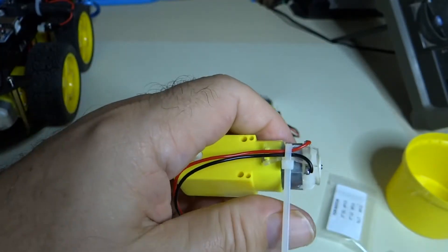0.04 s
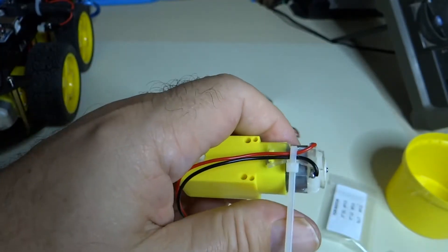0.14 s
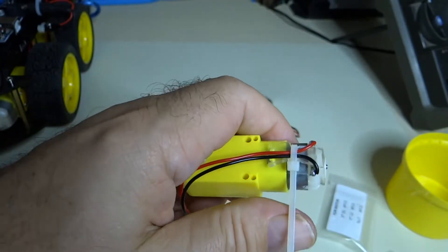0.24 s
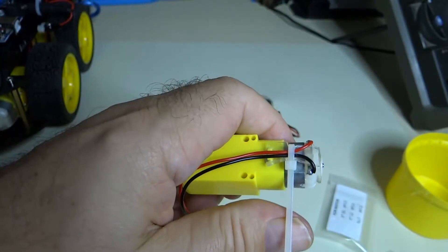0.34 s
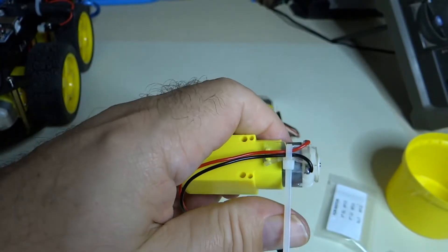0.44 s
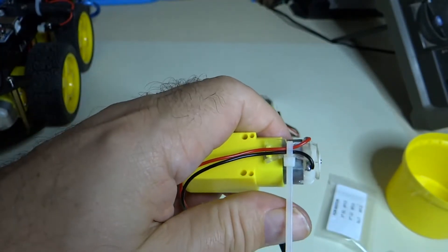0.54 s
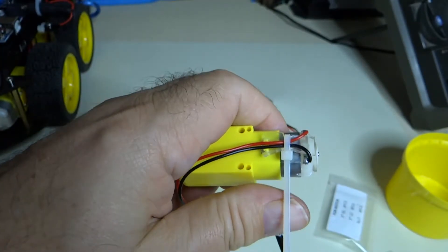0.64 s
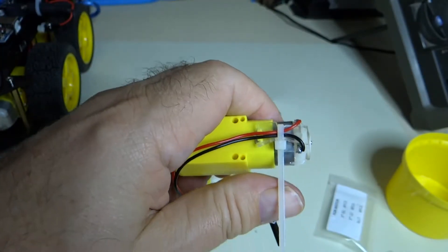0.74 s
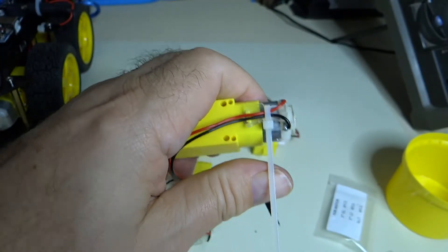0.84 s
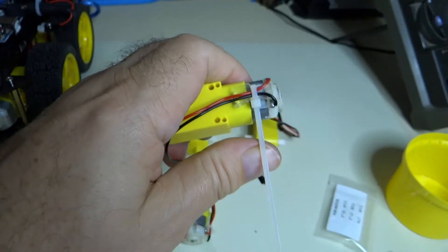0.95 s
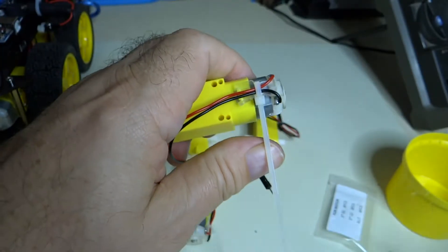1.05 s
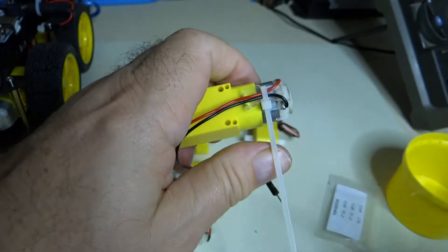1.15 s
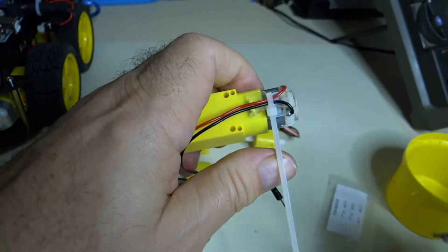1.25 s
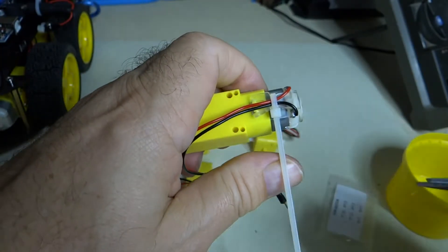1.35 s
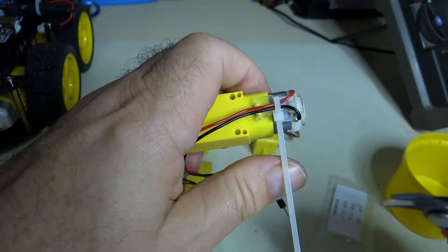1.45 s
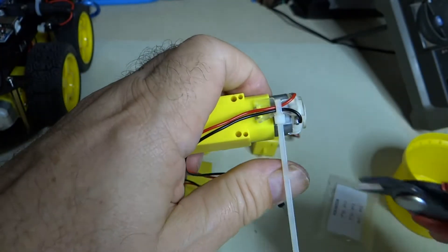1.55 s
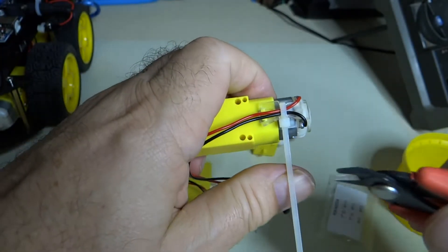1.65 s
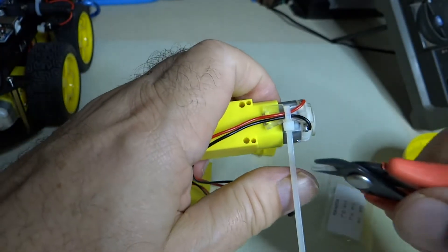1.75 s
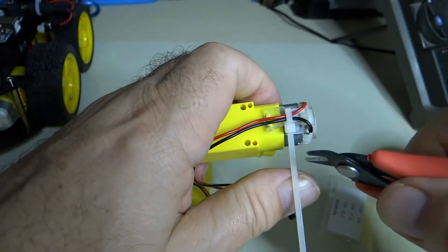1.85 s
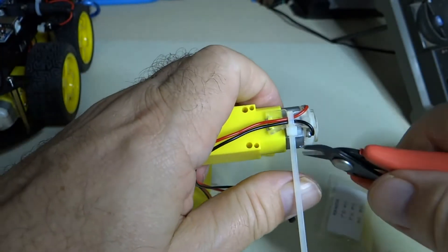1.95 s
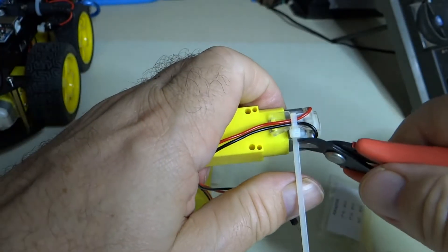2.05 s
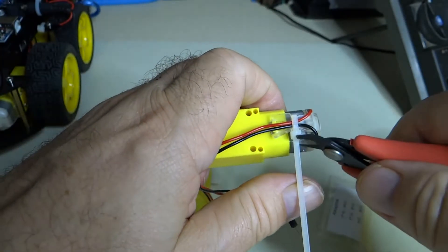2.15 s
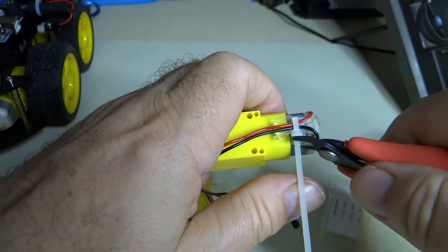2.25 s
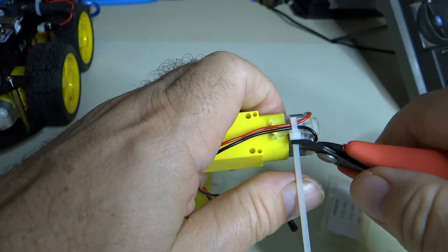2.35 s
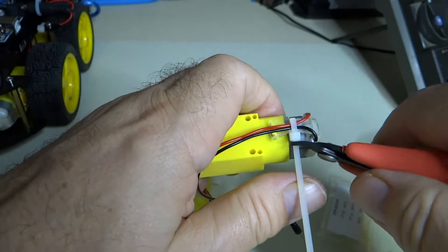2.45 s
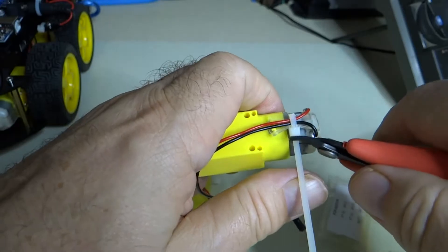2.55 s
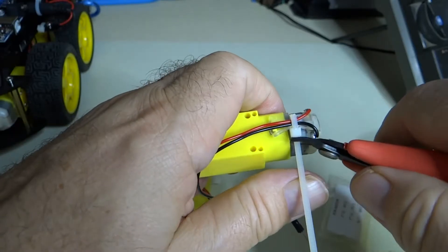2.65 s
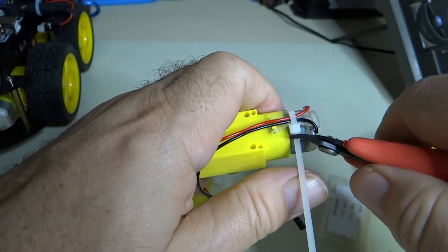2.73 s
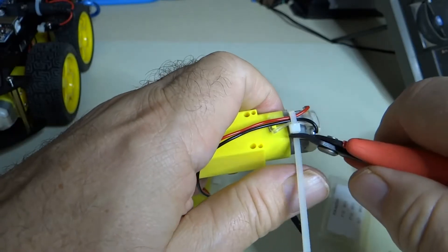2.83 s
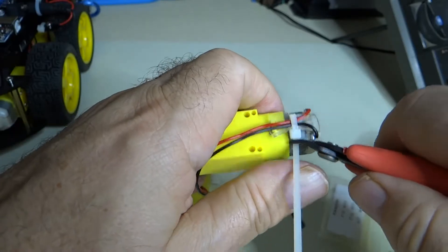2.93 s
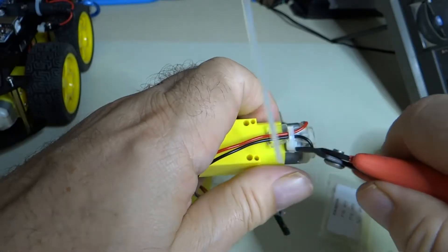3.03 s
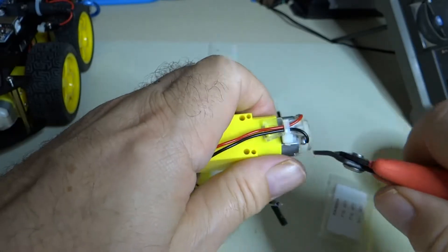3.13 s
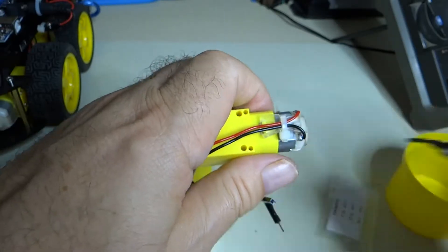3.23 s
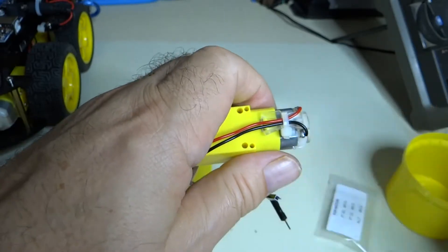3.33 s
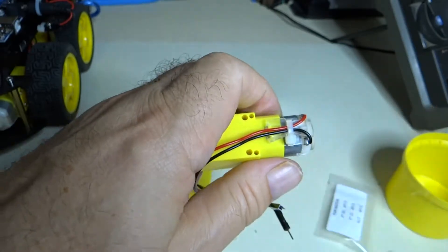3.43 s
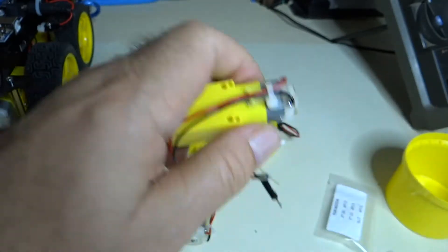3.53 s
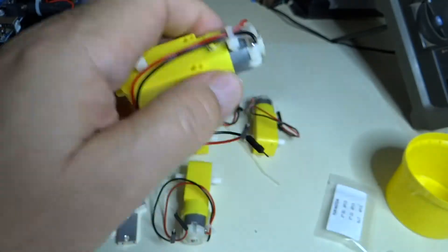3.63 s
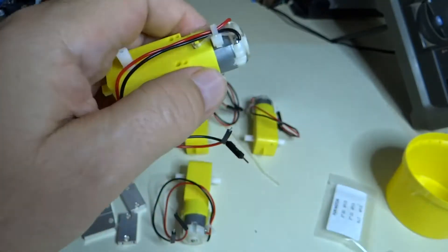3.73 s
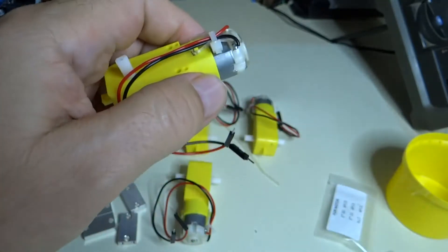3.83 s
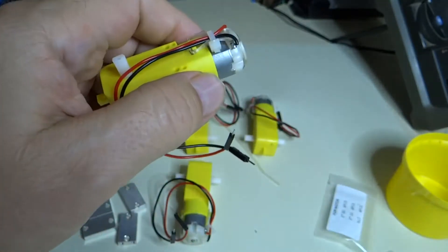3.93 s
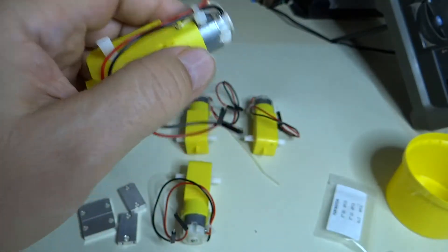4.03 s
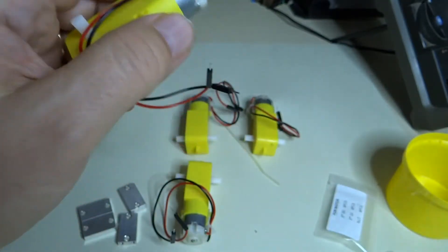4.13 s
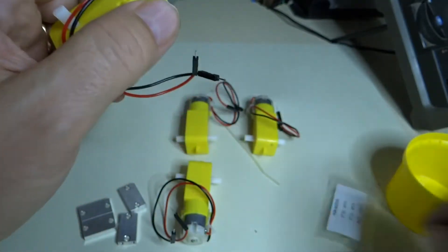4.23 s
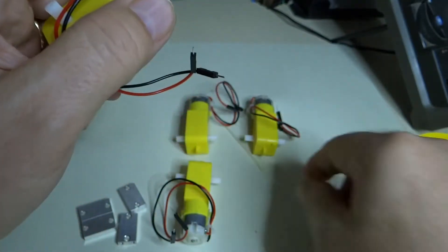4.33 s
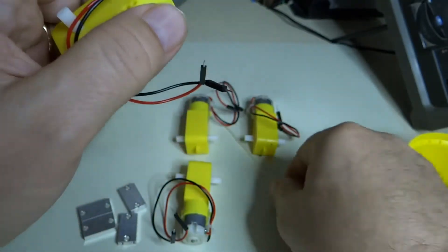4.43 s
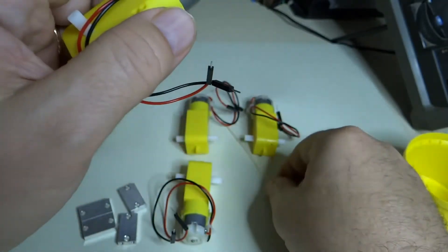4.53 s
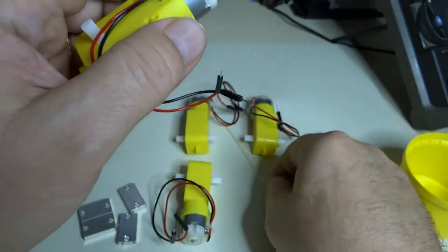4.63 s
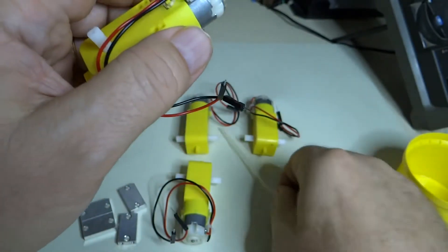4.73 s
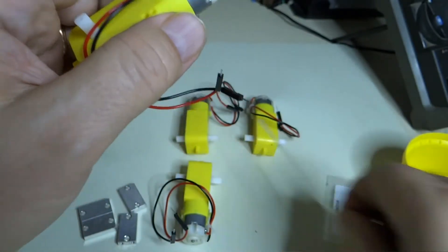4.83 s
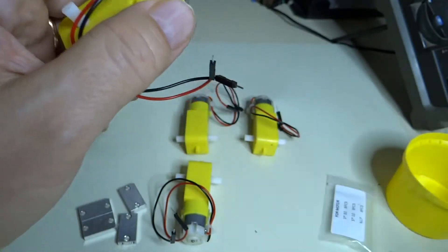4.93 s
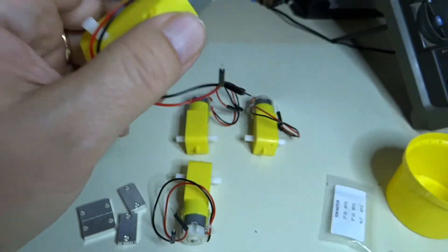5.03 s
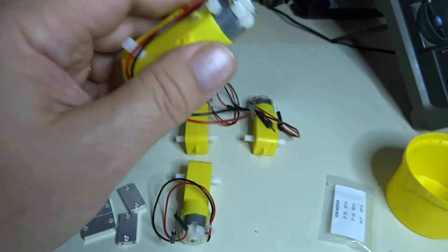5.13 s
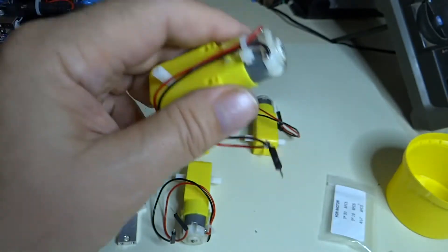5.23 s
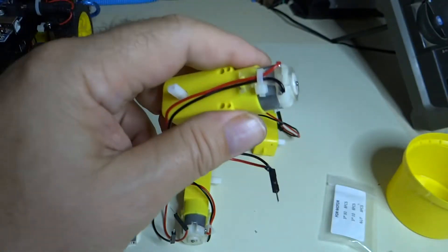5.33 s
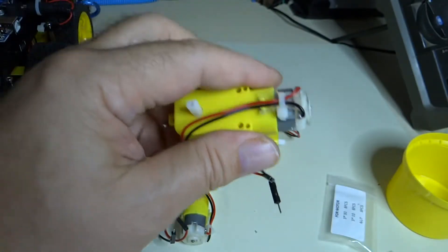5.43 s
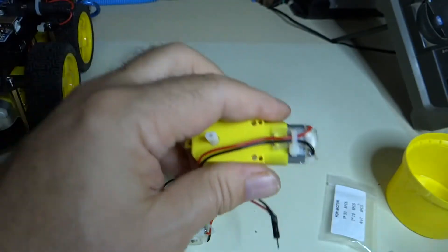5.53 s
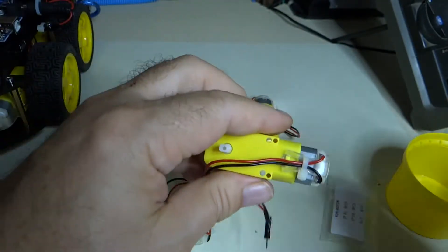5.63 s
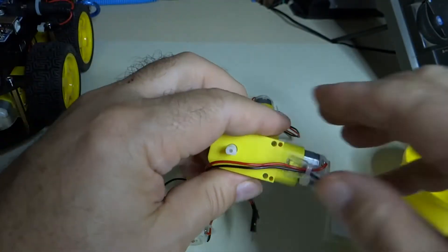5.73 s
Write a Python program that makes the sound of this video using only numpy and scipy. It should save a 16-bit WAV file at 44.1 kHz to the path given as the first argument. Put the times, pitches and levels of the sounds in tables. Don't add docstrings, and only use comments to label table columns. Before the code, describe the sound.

Close desk work in a quiet room: tool knock, faint ticks, a sharp plastic snip, springing snaps, a bouncing tool, soft sleeve rustle.

```python
import sys
import numpy as np
from scipy import signal
from scipy.fft import rfft, irfft, next_fast_len
from scipy.io import wavfile
from scipy.ndimage import uniform_filter1d

SR = 44100
rng = np.random.default_rng(int(sys.argv[2]) if len(sys.argv) > 2 else 0)


def wav_out(sig):
    wavfile.write(sys.argv[1], SR, np.round(np.clip(np.atleast_2d(sig).T, -1, 1) * 32767).astype(np.int16))


def gain_from_decibels(decibels):
    exponent = np.asarray(decibels, float) / 20
    return 10 ** exponent


N = 254677
LEAD = 2205

# [t/s, peak level/dB, centre f/Hz, room level/dB]
SNAPS = [(0.7297, -45.5, 4940, 0.5), (1.2306, -48, 8450, -10), (1.926, -35.5, 3300, -8),
         (2.2739, -48.5, 3780, -6), (2.7686, -39.5, 3780, -7), (3.031, -46.5, 4670, -3),
         (3.0839, -13.5, 5900, -7), (3.0884, -23, 4530, -13), (3.0924, -21, 5850, -15),
         (3.1054, -27, 4450, -12), (3.1418, -17, 5260, -9), (3.1454, -18, 6500, -7.5),
         (3.1524, -15.5, 8900, -7.5), (3.1614, -26, 7250, -7), (3.1954, -33.5, 7180, -9),
         (3.2244, -35, 5270, -12), (3.8372, -17, 9500, -9), (4.0367, -31, 12000, -6.5),
         (4.0627, -39, 8500, -9), (4.4094, -44, 8720, -7), (5.0833, -39, 4600, -11),
         (5.0907, -32, 10500, -4), (5.2342, -48.5, 2800, -7), (5.3457, -47, 8800, 0), (5.362, -41, 8660, 0),
         (5.4538, -45, 4980, 3), (5.4634, -45, 5280, -6), (2.045, -52, 1300, -10)]
# [f/Hz, level/dB, time to fall 60 dB/s]
EARLY_STEEL = [(8450, 1.5, 0.24), (10420, 3, .2), (11620, -3, .25), (12800, 2, .22), (14200, 5, .22),
               (15600, 0, .2)]
LATE_STEEL = [(7450, -5, .4), (8195, -9, .2), (10050, 2, .22), (11440, -12, .3), (13500, -2, .25)]
# [t/s, peak level/dB, main ring f/Hz]
DROP_BOUNCES = [
    (-.03, -8, 1620),
    (-.008, -9, 805),
    (.003, -9.5, 2100),
    (.011, -9, 1300),
    (.021, -8, 1670),
    (.031, -17, 826),
    (.065, -21, 1300),
]
NUDGE_BOUNCES = [
    (.387, -31, 1020),
    (.399, -34.5, 920),
    (.419, -38, 1070),
    (.44, -42, 888),
    (.479, -41, 890),
    (.489, -39, 1240),
    (.504, -41, 834),
    (.529, -46, 977),
]
SET_DOWN_BOUNCES = [
    (3.598, -18.5, 1060),
    (3.613, -15.5, 1830),
    (3.624, -19.5, 1140),
    (3.639, -26, 980),
    (3.659, -28, 1040),
    (3.75, -32.5, 1000),
    (3.764, -31.5, 999),
    (3.779, -29, 1080),
]
CLACK_BOUNCES = [
    (3.808, -7, 1070),
    (3.814, -10, 1150),
    (3.825, -10.5, 1180),
    (3.839, -13.5, 1150),
    (3.855, -17, 1070),
    (3.869, -27, 1190),
    (3.884, -23, 1540),
    (3.898, -22.5, 1200),
]
# [f/Hz, width/Hz, level/dB]
DESK_BODY = [(822, 42, 1), (1152, 57, -0.5), (1300, 34, -1), (1586, 89, -3.5), (2150, 31, -8),
             (2340, 67, -6.5), (2590, 40, -10.5), (3180, 26, -13.5), (3480, 42, -11.5)]
# [f/Hz, level/dB, time to fall 60 dB/s]
DESK_RING = [(554, -8, 0.65), (888, 2.5, 0.66), (1077, 0.5, .6), (1416, -5, 0.78)]
# [t/s, level/dB, f/Hz,
# time to fall 60 dB/s, pitch wobble share]
SMALL_RINGS = [(.73, -54, 2000, 0.085, .014), (.73, -58, 5030, .12, .02), (.85, -65, 2186, 3.9, 0.074),
               (3.75, -41.5, 2500, .3, 0.047), (3.75, -45, 4000, .4, .3), (3.901, -41, 1300, 0.3, 0.35),
               (5.116, -48.5, 1893, .13, .03), (5.457, -47.5, 1950, 0.06, .06),
               (-.01, -49, 3490, 0.65, 0.098), (-.01, -43.5, 4360, .65, .09), (-.01, -52, 5570, .6, 0.083)]
# [start t/s, lift t/s, level/dB, fade/dB per s, desk drone level/dB]
STROKES = [(.43, .5, -58.5, 110, -12), (.7, .73, -69, 70, -20), (.9, .98, -65.5, 50, -22),
           (1.14, 1.28, -62.5, 150, -23), (2.1, 2.27, -65.5, 200, -18), (3.01, 3.21, -53, 110, -9),
           (3.3, 3.46, -68, 30, -13), (4.02, 4.06, -59, 80, -13), (4.14, 4.32, -49, 95, -12),
           (4.36, 4.43, -56, 55, -13), (5.09, 5.14, -62, 45, -19), (5.2, 5.245, -62, 110, -15),
           (5.33, 5.38, -69, 100, -22), (5.43, 5.5, -64, 60, -20), (5.505, 5.6, -52.5, 100, -11),
           (5.555, 5.68, -48.5, 110, -9), (5.71, 5.82, -55, 60, -6)]
# [f/Hz, level/dB]
CLOTH_COLOUR = [(60, -35), (230, -15), (450, -9.5), (1050, -6.5), (3200, -7.5), (5800, -12.5), (8500, -11),
                (10500, -16.5), (12000, -29.5), (15800, -30.5)]
# [f/Hz, time to fall 60 dB/s]
ROOM_DECAY = [(100, 0.46), (500, 0.39), (1500, 0.35), (4500, 0.41), (10000, 0.31)]
# [f/Hz, level/dB]
AIR_COLOUR = [(25, -24), (52, -1.5), (90, -11), (180, -9), (260, -3), (600, -2.5), (900, -1), (1300, -6.5),
              (2100, -5.5), (4500, -10), (6000, -15.5), (8000, -11.5), (10500, -15.5), (13000, -22)]
# [f/Hz, width/Hz, level/dB]
FAN_LINES = [(50.6, 12, -89.5), (230, 30, -82.5), (1039.5, 30, -74), (2170, 120, -82), (9400, 15, -90.5)]
# [f/Hz, likeness 0 to 1]
LIKENESS = [(60, 1), (240, 0.97), (950, 0.35), (3770, 0.5), (15000, 0.83)]
# [f/Hz, level/dB]
CAPSULE = [(10000, 0), (11000, -6.5), (12200, -16), (16000, -16)]


def snip(db, thump_db, room_db):
    x = blow(t60=0.02, crack=0.12)
    mids = peaked(band(x, 1460, 5200))
    treble = peaked(band(x, 4300, 15500))
    y = gain_from_decibels(db) * peaked(mids + 0.58 * treble)
    return np.array([y + gain_from_decibels(db + thump_db) * thump(x), gain_from_decibels(room_db) * y])


def click(db, hz, room_db):
    chatter_s = 0.025 - 0.0001 * (db + 20)
    x = blow(chatter_s, crack=0.42)
    crack = peaked(band(x, 0.46 * hz, 2.5 * hz))
    centre = peaked(resonate(band(x, 0.6 * hz, 1.6 * hz), hz, 0.15 * hz))
    fizz = peaked(band(x, max(hz, 9000), 22000))
    y = gain_from_decibels(db + 1.5) * (peaked(crack + 0.3 * centre) + 0.09 * fizz)
    return np.array([y + gain_from_decibels(db - 42) * thump(x), gain_from_decibels(room_db) * y])


def thump(x):
    shell = peaked(resonate(resonate(x, 370, 200), 370, 200))
    hand = peaked(band(x, 25, 220))
    return shell + 0.12 * hand


def ring(db, modes, blur=0.0, room_db=-6):
    t = np.arange(SR // 2) / SR
    y = np.zeros(len(t))
    for hz, mode_db, t60 in modes:
        fall = gain_from_decibels(-60 * t / t60)
        drift = evened(uniform_filter1d(rng.standard_normal(len(t)), size=40))
        wobble = blur * hz * np.cumsum(drift) / SR
        y += gain_from_decibels(db + mode_db) * fall * np.sin(2 * np.pi * (hz * t + wobble))
    y *= np.minimum(t / 0.002, 1)
    return np.array([y, gain_from_decibels(room_db) * y])


def landing(bounces, thud_db, edge_db, room_db, clank):
    sounds = []
    for k, (s, db, hz) in enumerate(bounces):
        first_db = 6.5 if k == 0 else 0
        sounds.append((s, knock(db, thud_db, edge_db + first_db, room_db, hz, clank)))
    return sounds


def knock(db, thud_db, edge_db, room_db, hz, clank):
    x = blow(t60=0.03, crack=0.31)
    soft = band(x, 450, 2500 + 2400 * clank)
    desk = peaked(sum(gain_from_decibels(g) * resonate(soft, f, 3.5 * width) for f, width, g in DESK_BODY))
    tool = peaked(resonate(soft, hz, 0.32 * hz))
    hard = peaked(resonate(x, 4000, 2400))
    y = peaked(0.74 * desk + 1.1 * tool + clank * hard)
    y = y + gain_from_decibels(thud_db + 6) * peaked(band(x, 330, 761))
    y = y + gain_from_decibels(edge_db) * peaked(band(x, 3000, 10950))
    y = y + gain_from_decibels(thud_db - 17.5) * peaked(band(x, 25, 210))
    y = gain_from_decibels(db + 0.13) * y
    return np.array([y, gain_from_decibels(room_db) * y])


def blow(t60, crack):
    t = np.arange(3000) / SR
    fall = gain_from_decibels(-60 * t / t60)
    return (t == 0) + crack * rng.standard_normal(len(t)) * fall


def hits():
    mix = np.zeros((2, N + LEAD))
    add(mix, 2.686, snip(db=-18, thump_db=-17.5, room_db=-10.5))
    for s, db, hz, room_db in SNAPS:
        add(mix, s, click(db, hz, room_db))
    add(mix, -0.008, ring(-39, EARLY_STEEL, blur=0.012))
    add(mix, 3.838, ring(-33, LATE_STEEL, blur=0.03))
    landings = [landing(DROP_BOUNCES, thud_db=-17.5, edge_db=-23.5, room_db=-1, clank=0.3),
                landing(NUDGE_BOUNCES, thud_db=-14, edge_db=-20, room_db=-1.5, clank=0.15),
                landing(SET_DOWN_BOUNCES, thud_db=-15, edge_db=-21.5, room_db=-3.5, clank=0.2),
                landing(CLACK_BOUNCES, thud_db=-20.5, edge_db=-24.5, room_db=-6, clank=0.95)]
    for sounds in landings:
        for s, sound in sounds:
            add(mix, s, sound)
    add(mix, 0, ring(-36, DESK_RING, blur=0.025))
    for s, db, hz, t60, blur in SMALL_RINGS:
        add(mix, s, ring(db, [(hz, 0, t60)], blur))
    heard = mix[0] + room(mix[1])[:, :N + LEAD]
    return capsule(heard)[:, LEAD:LEAD + N]


def slides():
    rub = hiss(CLOTH_COLOUR, patchy_db=0.4, like=1.4)
    catches = evened(uniform_filter1d(rng.standard_normal(N), size=300))
    rub *= gain_from_decibels(0.91 * catches)
    rub /= np.std(band(rub[0], 1500, 9000))
    drone = evened(resonate(resonate(rub, 534, 73), 534, 73))
    t = np.arange(0, N + 64, 64) / SR
    early = t + 0.025
    fibre_power, desk_power = 0, 0
    for *stroke, drone_db in STROKES:
        fibre_power = fibre_power + pressure(t, *stroke) ** 2
        desk_power = desk_power + (gain_from_decibels(drone_db) * pressure(early, *stroke)) ** 2
    now = np.arange(N) / SR
    fibres = np.interp(now, t, np.sqrt(fibre_power))
    desk = np.interp(now, t, np.sqrt(desk_power))
    return fibres * rub + desk * drone


def pressure(t, start, lift, db, fade_db_per_s):
    touch = np.clip((t - start) / 0.06, 0, 1) ** 2
    return touch * gain_from_decibels(db - fade_db_per_s * np.maximum(t - lift, 0))


def room(x):
    taps = np.zeros((2, SR))
    at = np.arange(120, SR - 20, 20) + rng.integers(0, 20, (2, (SR - 121) // 20))
    np.put_along_axis(taps, at, rng.choice([-1.0, 1.0], at.shape), axis=1)
    hz, t, z = signal.stft(taps, SR, nperseg=256)
    fall = gain_from_decibels(-60 * t / read(ROOM_DECAY, hz)[:, None])
    common, apart = signal.istft(z * fall, SR, nperseg=256)[1]
    apart = 0.34 * band(apart, 300, 11000)
    tail = np.array([common + apart, common - apart])
    return signal.fftconvolve(x[None], tail / np.linalg.norm(common), axes=1)


def air():
    wash = hiss(AIR_COLOUR, patchy_db=1.5, like=0.99)
    fan = sum(gain_from_decibels(db) * evened(resonate(wash, hz, width)) for hz, width, db in FAN_LINES)
    return gain_from_decibels(-64) * wash + fan


def hiss(colour, patchy_db, like):
    frames, hz = N // 128 + 6, np.fft.rfftfreq(512, 1 / SR)
    a, b, c, d, patches = rng.standard_normal((frames, 257, 5)).T
    patches = uniform_filter1d(patches, size=6, axis=0)
    patches = evened(uniform_filter1d(patches, size=20, axis=1))
    same = np.clip(like * read(LIKENESS, hz), -1, 1)[:, None]
    left = a + 1j * b
    right = same * left + np.sqrt(1 - same ** 2) * (c + 1j * d)
    z = np.array([left, right]) * gain_from_decibels(read(colour, hz)[:, None] + patchy_db * patches)
    return evened(signal.istft(z, nperseg=512, noverlap=384)[1][:, :N])


def capsule(x):
    size = next_fast_len(N + LEAD)
    gain = gain_from_decibels(read(CAPSULE, np.fft.rfftfreq(size, 1 / SR)))
    return irfft(rfft(x, size) * gain, size)


def evened(x):
    return x / np.sqrt(np.mean(x ** 2) + 1e-20)


def peaked(x):
    return x / abs(x).max()


def read(points, hz):
    f, value = np.transpose(points)
    return np.interp(np.log(hz + 1), np.log(f + 1), value)


def add(mix, s, sound):
    part = mix[:, LEAD + round(s * SR):][:, :len(sound.T)]
    part += sound[:, :len(part.T)]


def resonate(x, hz, width):
    return signal.lfilter(*signal.iirpeak(min(hz, 0.45 * SR), hz / width, SR), x)


def band(x, lo_hz, hi_hz):
    return signal.sosfilt(signal.butter(3, [lo_hz, min(hi_hz, 0.45 * SR)], "band", fs=SR, output="sos"), x)


def scene():
    balance = gain_from_decibels(np.array([[-0.1], [0.1]]))
    return hits() * balance + slides() + air()


def top_cut(x):
    return signal.sosfilt(signal.butter(12, 15990, fs=SR, output="sos"), x)


def record(dry):
    thin = signal.sosfilt(signal.butter(3, 22, "high", fs=SR, output="sos"), dry)
    limit = signal.firwin(401, 15900, window=("kaiser", 9), fs=SR)
    mix = signal.oaconvolve(thin, limit[None], "same")
    return top_cut(mix)


dry = scene()
out = record(dry)
wav_out(out)
```